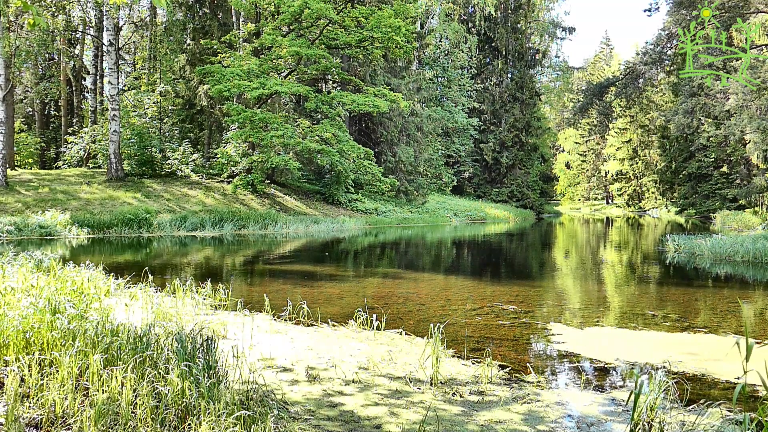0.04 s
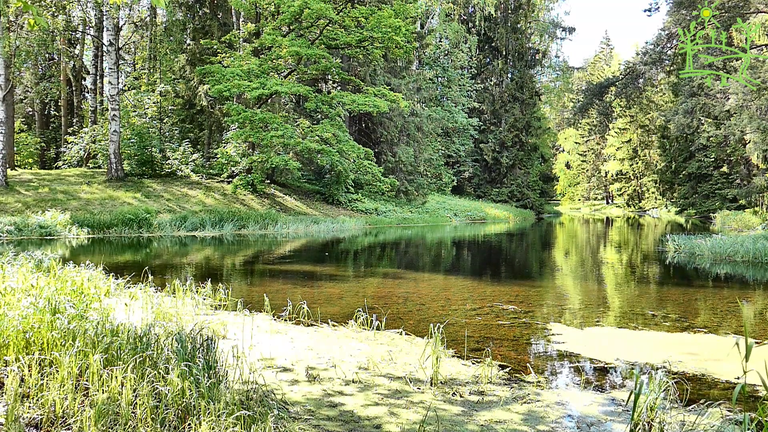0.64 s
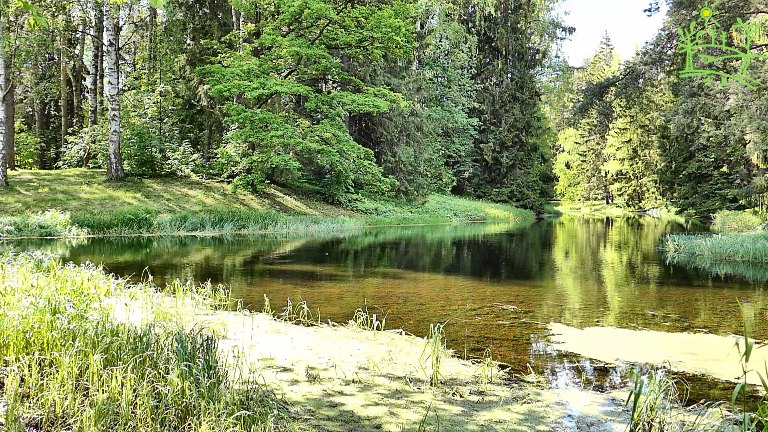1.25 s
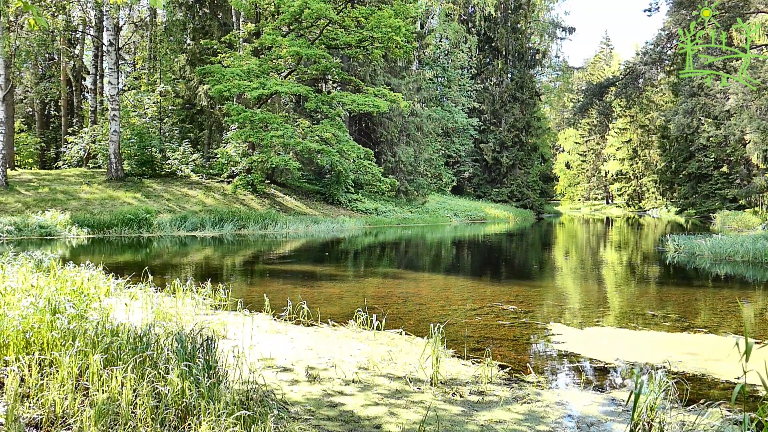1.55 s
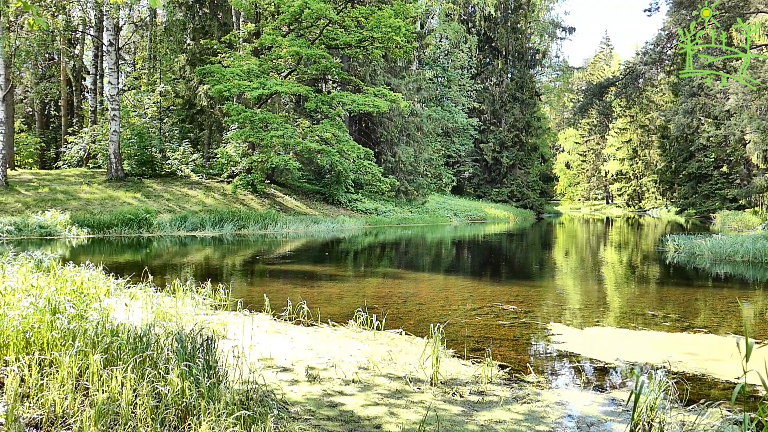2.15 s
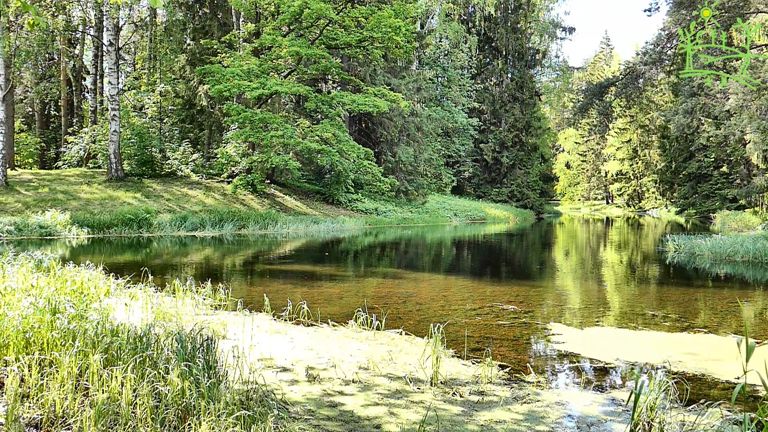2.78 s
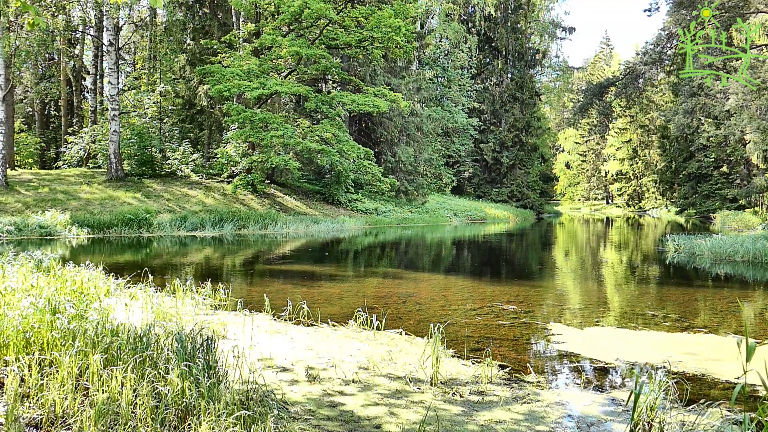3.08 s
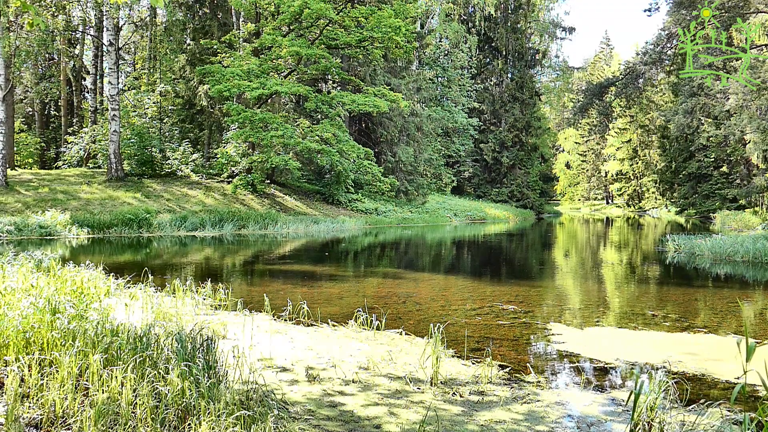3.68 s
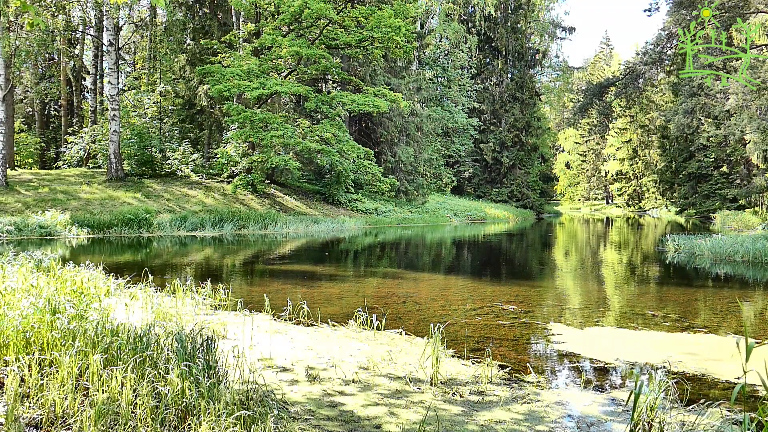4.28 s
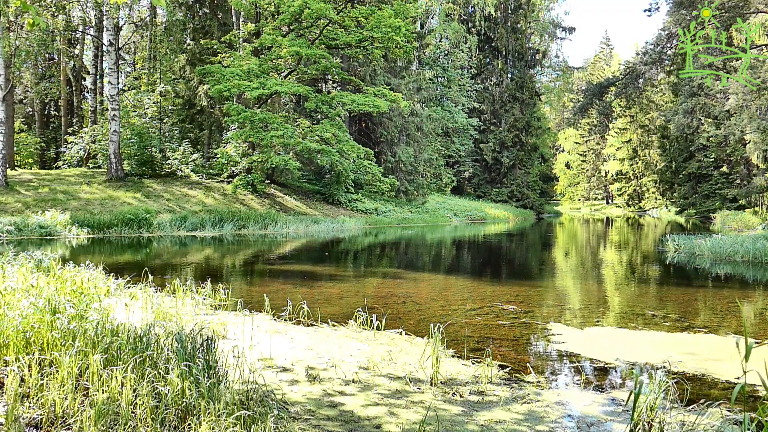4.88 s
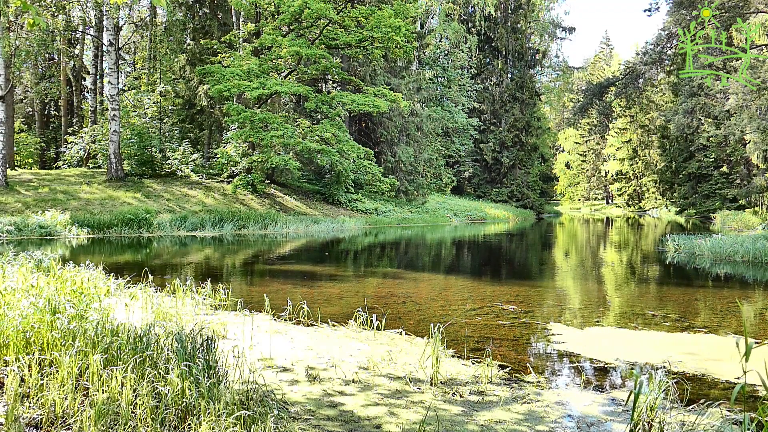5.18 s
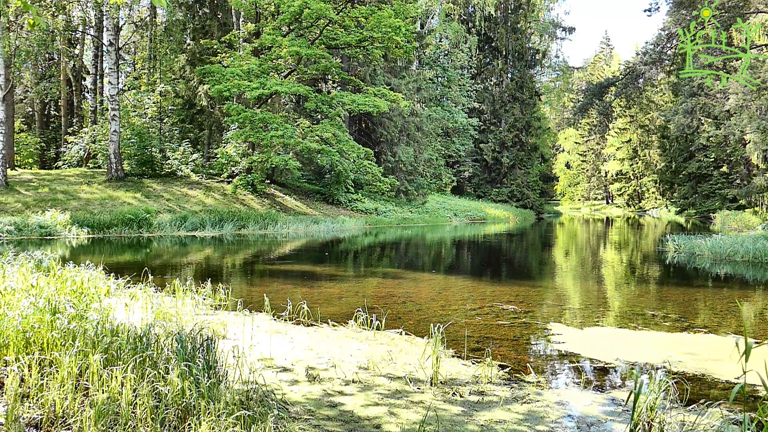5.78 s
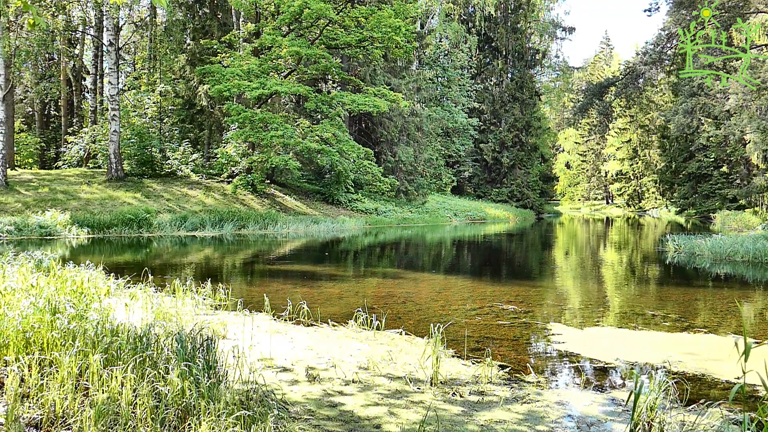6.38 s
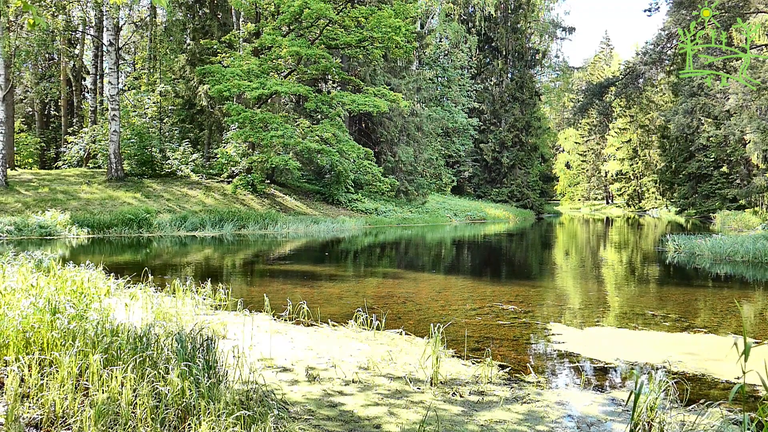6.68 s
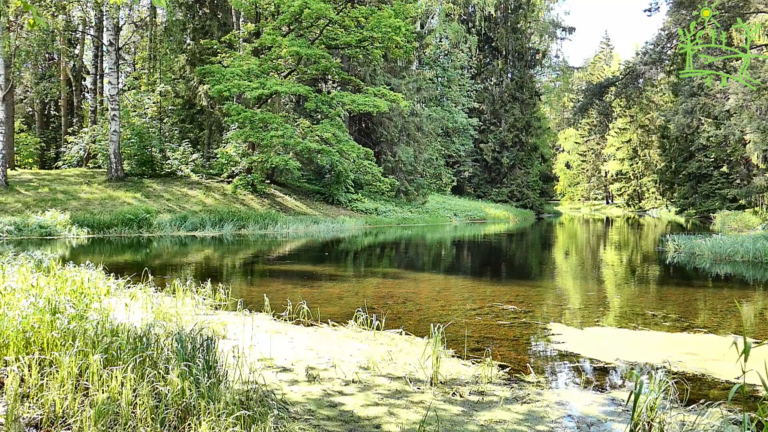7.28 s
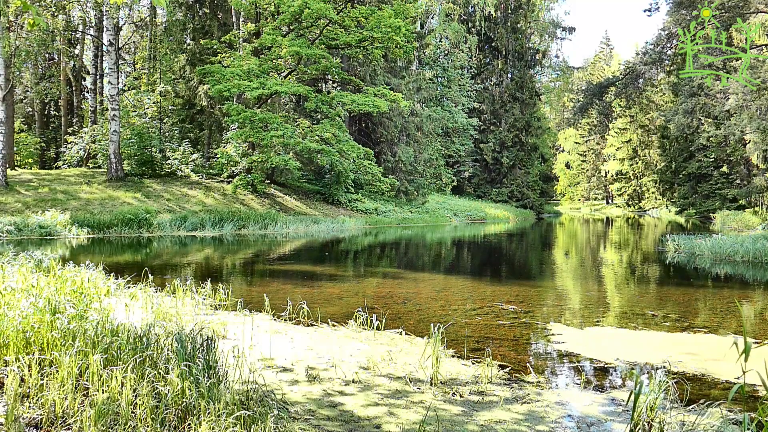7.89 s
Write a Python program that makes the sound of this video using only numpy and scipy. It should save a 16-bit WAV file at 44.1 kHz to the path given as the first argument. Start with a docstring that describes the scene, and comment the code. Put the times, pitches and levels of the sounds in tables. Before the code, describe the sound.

Songbirds sing by a forest pond over very faint, still air. From about 0.2 to 1.4 seconds, one bird gives three high arched whistles, each followed by a pure falling slur. Two faint pips come near 1.8 and 2.1 seconds, and a barely audible distant call near 3. The whistler resumes at about 3.1 seconds, alternating whistles and slurs and growing louder until 4.7. From 4 to 5.1 seconds, a second bird deeper among the trees overlaps it with about eight quick downward slides that ring longer. A rapid twittering phrase of chips and scooping notes, with soft raspy sounds between them, runs from 5.2 to 6 seconds and ends in an upward flourish. After a lull, a second twitter runs from 7.4 to about 8.1 seconds. The high notes carry a bright, fluttering shimmer, and the trees add a light echo.

```python
"""Songbirds at a forest pond: high arched whistles alternate with long falling slurs. A second bird joins
with a run of slides, then come two quick twittering phrases with a raspy murmur between the syllables.
Every note is a gliding pure tone; a bright, fluttering octave shimmer is laid over the high notes. The
ground, leaves and trunks echo the song, and the far bank answers faintly over very still air."""
import sys
import numpy as np
from scipy import signal
from scipy.fft import rfft, irfft, next_fast_len
from scipy.io import wavfile
from scipy.ndimage import uniform_filter1d

SR = 44100
rng = np.random.default_rng(int(sys.argv[2]) if len(sys.argv) > 2 else 0)


def unload_wav(signal):
    """Save mono or channel-first audio to the path in sys.argv[1] as 16-bit WAV at rate SR, clipped to [-1, 1]."""
    wavfile.write(
        sys.argv[1],
        SR,
        np.round(np.clip(np.atleast_2d(signal).T, -1, 1) * 32767).astype(np.int16),
    )


N = 358974

# The whistler's slurs. Each row: start and length in seconds, pitch factor at the head and at the tail,
# level in dB, swell over the note in dB.
SLUR_CUES = [(0.3881, 0.16, 1, 0.99, -20, 0.5), (0.79, 0.15, 0.97, 0.99, -20.5, -8),
             (1.18, 0.148, 0.96, 0.96, -24.5, -6), (3.0679, 0.15, 0.94, 1.012, -27, -0.5),
             (3.434, 0.15, 0.96, 1, -19.5, -2), (3.8175, 0.1571, 0.95, 0.97, -18.5, 0),
             (4.2039, 0.13, 1.014, 0.99, -17.5, -1.5), (4.5778, 0.14, 0.99, 0.99, -17.5, 2)]


def undb(db):
    """Decibels to gain."""
    return 10 ** (np.asarray(db) / 20)


def curve(rows, at):
    """Straight lines through (x, value) rows."""
    return np.interp(at, *np.transpose(rows))


def colour(x, spectrum):
    """Equalise a sound through (Hz, dB) points."""
    hz, db = np.transpose(spectrum)
    size = next_fast_len(N + SR // 10)
    bin_hz = np.arange(size // 2 + 1) * SR / size
    gain = undb(np.interp(np.log(bin_hz + 1), np.log(hz), db))
    return irfft(rfft(x, size) * gain, size)[..., :N]


def noise(spectrum, width):
    """Coloured stereo noise whose mid has rms 1; width is side over mid."""
    mid, side = colour(rng.standard_normal((2, N)), spectrum)
    return (mid + width * side * np.array([[1], [-1]])) / np.std(mid)


def add(track, start_s, sound):
    """Mix a sound into a track at a time."""
    i = max(int(start_s * SR), 0)
    part = sound[..., :max(track.shape[-1] - i, 0)]
    track[..., i:i + part.shape[-1]] += part


def gliding_note(hz, db, waver, edge_s):
    """A wavering, gliding tone and a copy an octave up, fading in over edge_s and out over twice that."""
    n = len(hz)
    wobble = 10 * uniform_filter1d(rng.standard_normal(n), size=100)
    hz = uniform_filter1d(hz * (1 + waver * wobble), size=40, mode="nearest")
    phase = 2 * np.pi * np.cumsum(hz) / SR
    edge = np.clip(np.minimum(np.arange(n), np.arange(n)[::-1] / 2) / (edge_s * SR), 0, 1)
    loudness = np.sqrt(2) * undb(db) * np.sin(edge * np.pi / 2) ** 2
    return loudness * np.array([np.sin(phase), np.sin(2 * phase)])


def syllables(shape, cues, octave_db, waver, edge_s):
    """One learnt shape, stretched, bent and swelled anew each time it is sung."""
    voice = np.zeros((2, N))
    share, shape_hz, shape_db = np.transpose(shape)
    for start, length, head, tail, db, swell_db in cues:
        progress = np.arange(int((length + edge_s) * SR)) / (length * SR)
        hz = np.interp(progress, share, shape_hz) * (head + progress * (tail - head))
        level_db = db + np.interp(progress, share, shape_db) + swell_db * (progress - .5)
        add(voice, start, gliding_note(hz, level_db, waver, edge_s))
    return voice * undb([[0], [octave_db]])


def glides(notes, octave_db, crest, droop_db, waver, edge_s=.0025):
    """Straight pitch sweeps, loudest at the crest (a share of the length) and weaker towards both ends."""
    voice = np.zeros((2, N))
    for start, length, from_hz, to_hz, db in notes:
        progress = np.arange(int((length + edge_s) * SR)) / (length * SR)
        hz = from_hz + progress * (to_hz - from_hz)
        level_db = db - droop_db * (2 * (progress - crest)) ** 2
        add(voice, start, gliding_note(hz, level_db, waver, edge_s))
    return voice * undb([[0], [octave_db]])


def flutter(voice):
    """Lay the octave shimmer over the tone; its time-shifted copies beat together and flutter."""
    # The octave's EQ. Each row: frequency in Hz, gain in dB.
    octave_eq = [(7800, -81.5), (8050, -44), (8400, -4.5), (9500, -3.5), (11000, -1.5), (13000, -4),
                 (13600, -12.5), (14500, -24.5)]
    # Its copies. Each row: time shift in seconds, gain in dB.
    copies = [(-.0058, -1), (0, 0.5), (.0058, -3), (0.0127, -16)]
    tone, octave = voice
    octave = colour(octave, octave_eq)
    return tone + sum(undb(db) * np.roll(octave, int(shift * SR)) for shift, db in copies)


def scatter(envelope, width):
    """Countless small echoes under an envelope, with unit energy."""
    mid, side = rng.standard_normal((2, len(envelope))) * envelope / np.sqrt(np.sum(envelope ** 2))
    return (mid + width * side * np.array([[1], [-1]])) / np.sqrt(1 + width ** 2)


def forest(voice, leaves_db, leaves_t60, trunks_db, trunks_t60, bank_db, width, dull_hz, pan_db=0):
    """A voice, with the shimmer laid over it, echoes off the ground, leaves, trunks and the far bank."""
    # Near reflections. Each row: delay in seconds, gain in dB, left minus right in dB.
    reflections = [(.011, -7.5, 0.5), (0.0032, -21.5, -6), (0.013, -23, -2.5)]
    # The far bank's answer. Each row: delay in seconds, relative level in dB.
    bank_envelope = [(.03, -23), (.12, -7), (.3, 0), (.55, -4.5), (.8, -18.5), (1.3, -39.5)]
    # Widening that leaves the treble nearer the centre. Each row: frequency in Hz, side gain in dB.
    side_eq = [(2500, 7), (6000, 4.5), (9000, 3), (13000, -1.5)]
    t = np.arange(int(1.5 * SR)) / SR
    onset = 1 - np.exp(-t / .0031)
    leaves = undb(leaves_db) * scatter(onset * undb(-60 * t / leaves_t60), width)
    trunks = undb(trunks_db) * scatter(onset * undb(-60 * t / trunks_t60), width)
    bank = undb(bank_db) * scatter(undb(curve(bank_envelope, t)), width)
    # foliage soaks up the treble on the long paths between the trunks
    response = leaves + bank + signal.lfilter(*signal.butter(1, dull_hz, fs=SR), trunks)
    response[:, 0] += undb(np.array([pan_db, -pan_db]) / 2)  # direct sound
    for delay, db, side_db in reflections:
        add(response, delay, undb(db + np.array([[side_db], [-side_db]]) / 2))
    left, right = signal.fftconvolve(flutter(voice)[None], response, axes=1)[:, :N]
    return (left + right) / 2 + colour((left - right) / 2, side_eq) * np.array([[1], [-1]])


def background(song):
    """Still air, the last ring of an earlier phrase, a faint noise that swells and fades with the song."""
    # The four noise colours. Each row: frequency in Hz, relative level in dB.
    air_eq = [(25, 1.5), (60, -11), (100, -5.5), (150, -20.5), (250, -16.5), (370, -18), (600, -24.5),
              (1500, -26), (3200, -18), (4300, -22.5), (6500, -25.5), (8000, -21), (9500, -19),
              (12500, -21), (15500, -26.5)]
    ring_eq = [(2500, -35), (3400, 1.5), (4700, -4), (5600, -24), (8000, -30.5), (8600, -3), (9600, -4.5),
               (10500, -22), (15000, -38.5)]
    song_noise_eq = [(25, 9.5), (100, -2.5), (250, -6.5), (500, -13.5), (1300, -20.5), (2200, -8),
                     (4000, 0.5), (15000, -20)]
    crackle_eq = [(30, -0.5), (300, -9), (1200, -11), (2500, -28.5), (8000, -63.5)]
    t = np.arange(N) / SR
    air = undb(-81) * noise(air_eq, width=.6)
    ring_db = curve([(0, -67), (.22, -70.5), (.8, -100), (1.5, -130)], t)
    ring = undb(ring_db) * noise(ring_eq, width=.65)
    song_rms = np.sqrt(np.abs(uniform_filter1d(song[0] ** 2, size=600)))
    song_noise = undb(-50.5) * song_rms ** .6 * noise(song_noise_eq, width=.82)
    # a brief low crackle on the loud second slur
    crackle = undb(-53) * np.exp(-np.abs(t - .806) / .005) * noise(crackle_eq, width=.4)
    return air + ring + song_noise + crackle


def distant_bird():
    """Faint calls from across the water, mostly echo."""
    # Each row: start and length in seconds, first and last pitch in Hz, level in dB.
    calls = [(2.04, 0.027, 3000, 3530, -99), (2.235, 0.031, 4000, 2897, -90),
             (2.435, 0.077, 3500, 3014, -86), (3.01, 0.043, 4200, 3710, -67.5)]
    voice = glides(calls, octave_db=-18.5, crest=.55, droop_db=5.5, waver=.02)
    return forest(voice, leaves_db=6, leaves_t60=.3, trunks_db=-4, trunks_t60=.7,
                  bank_db=-20.5, width=.8, dull_hz=5910, pan_db=-1)


def murmurer():
    """One soft raspy figure after every scoop and hook of the twitter, half lost in its own echo."""
    # A held note, a low note and a drop. Each row: delay and length in seconds, first and last base
    # pitch in Hz, relative level in dB.
    figure = [(0, .019, 2950, 3380, 0), (.028, .016, 2200, 2080, -12), (.045, .011, 3620, 2400, -5)]
    # Each row: start of the figure in seconds, pitch factor, level in dB.
    cues = [(5.354, 1.013, -37), (5.4617, 1.06, -36), (5.723, 1.013, -37.5), (5.834, .98, -34.5),
            (7.596, 1.08, -43.5), (7.719, 1.02, -45), (7.973, 1.04, -44.5), (8.078, 1.094, -38)]
    # A soft dip and rise open the last phrase. Each row: start and length in seconds, first and last
    # pitch in Hz, level in dB.
    opening = [(7.358, .015, 3280, 2700, -49), (7.378, .0063, 3020, 5410, -61)]
    notes = [(start + delay, length, pitch * from_hz, pitch * to_hz, db + note_db)
             for start, pitch, db in cues for delay, length, from_hz, to_hz, note_db in figure]
    voice = glides(opening + notes, octave_db=-.5, crest=.32, droop_db=3, waver=.055)  # deep waver rasps
    return forest(voice, leaves_db=-5.5, leaves_t60=.14, trunks_db=-11.5, trunks_t60=.59,
                  bank_db=-30.5, width=.37, dull_hz=9000)


def pips(length_s=.021):
    """Brief high notes of nearly level pitch."""
    # Each row: start in seconds, first and last pitch in Hz, level in dB.
    cues = [(1.752, 4980, 5265, -46), (2.145, 5310, 5174, -49.5), (2.66, 5140, 5143, -84.5),
            (4.899, 5380, 5180, -31), (5.053, 5315, 5070, -36.5)]
    notes = [(start, length_s, from_hz, to_hz, db) for start, from_hz, to_hz, db in cues]
    return glides(notes, octave_db=-2, crest=.28, droop_db=3, waver=.0087)


def twitterer():
    """Rounds of chip, scoop and hook; an upward flourish closes the first phrase. Brief high pips, two of them
    at the top of the second bird's slides, are mixed in with this echo."""
    # Syllable shapes. Each row: share of the length, base pitch in Hz, relative level in dB.
    chip = [(0.0, 6244, -4.5), (0.15, 5090, 2.5), (0.35, 4685, 9.5), (0.55, 4425, 3.5), (0.75, 4070.0, 8),
            (1.0, 2560, -16)]
    scoop = [(0.0, 6016, 11), (0.1, 3240, -2), (0.23, 2390, -15), (0.5, 2090, -33.5), (0.62, 3220, -6.5),
             (0.73, 4760.0, 2.5), (0.86, 5087, -1), (1.0, 5066, -5.5)]
    hook = [(0, 2567, 2), (.14, 4950, -4), (.3, 6000, -20), (.52, 6546, -6.5), (.75, 5740, 16.5),
            (.89, 4310, 9), (1, 2820, -15.5)]
    flourish = [(0, 3104, -10), (.25, 3662, -8.5), (.38, 4676, -3.5), (.5, 5564, -2), (.7, 6050, 1.5),
                (.88, 6230, -5.5), (1, 6385, -4)]
    # Where each is sung. Each row: start and length in seconds, pitch factor at the head and at the
    # tail, level in dB, swell over the note in dB.
    chip_cues = [(5.2189, 0.027, 0.99, 0.86, -30.5, -23.5), (5.5773, 0.03, 0.97, 0.98, -26, -6),
                 (7.46, 0.025, 1.072, 1.05, -31.5, 6.5), (7.8344, 0.021, 1.083, 1.04, -24, 5.5)]
    scoop_cues = [(5.2741, 0.045, 0.9, 1.013, -26.5, 9.5), (5.639, 0.049, 0.87, 1.077, -33, -5.5),
                  (7.5172, 0.048, 1.036, 1.018, -32.5, 17.5), (7.889, 0.046, 1.034, 0.96, -24.5, 15.5)]
    hook_cues = [(5.4015, 0.034, 0.99, 0.99, -35, -8), (5.773, 0.035, 1.17, 0.89, -39.5, -4.5),
                 (7.648, .032, 1.13, 0.95, -37.5, -6.5), (8.019, 0.036, 1.04, 0.9, -43, 20)]
    flourish_cues = [(5.945, 0.047, 0.96, 1, -22.5, 0)]
    voice = syllables(chip, chip_cues, octave_db=1.5, waver=.005, edge_s=.00099)
    voice += syllables(scoop, scoop_cues, octave_db=.5, waver=.02, edge_s=.0023)
    voice += syllables(hook, hook_cues, octave_db=1, waver=.0041, edge_s=.0014)
    voice += syllables(flourish, flourish_cues, octave_db=1, waver=.013, edge_s=.0029)
    voice += pips()
    return forest(voice, leaves_db=-8.5, leaves_t60=.15, trunks_db=-15, trunks_t60=.37,
                  bank_db=-34.5, width=.42, dull_hz=12000)


def slider():
    """A second bird deeper among the trees, with a longer ring; its slides all fall at one rate."""
    # Each row: start and length in seconds, first pitch in Hz, level in dB.
    slides = [(3.9736, 0.053, 4874, -33), (4.1417, 0.065, 5087, -26), (4.2973, 0.065, 5037, -24.5),
              (4.449, 0.06, 4960, -21.5), (4.601, 0.067, 5080, -26.5), (4.7534, 0.067, 5050, -23.5),
              (4.919, 0.016, 4840, -25), (4.9347, 0.055, 4616, -27.5), (5.0732, 0.072, 5084, -23)]
    fall_hz_per_s = 37700
    notes = [(start, length, hz, hz - fall_hz_per_s * length, db) for start, length, hz, db in slides]
    voice = glides(notes, octave_db=2.5, crest=.28, droop_db=7.5, waver=.007)
    return forest(voice, leaves_db=-7.5, leaves_t60=.3, trunks_db=-9.5, trunks_t60=1,
                  bank_db=-42.5, width=.14, dull_hz=11000, pan_db=3)


def ornaments():
    """The quick upward flick that announces each slur and the faint falling note that trails it."""
    # Each row: start in seconds, level in dB.
    flick_cues = [(0.364, -40.5), (.763, -22.5), (1.162, -27.5), (3.048, -53), (3.4117, -30.5),
                  (3.8049, -25), (4.181, -25), (4.555, -27.5)]
    flick_s, flick_hz = .0098, (4850, 6600)
    trail_delay_s, trail_s, trail_hz, trail_db = .208, .024, (5600, 4250), -36
    flicks = [(start, flick_s, *flick_hz, db) for start, db in flick_cues]
    trails = [(start + trail_delay_s, trail_s, *trail_hz, db + trail_db)
              for start, _, _, _, db, _ in SLUR_CUES]
    return glides(flicks + trails, octave_db=1, crest=.43, droop_db=2.5, waver=.006)


def whistler():
    """The lead bird: arched whistles, each answered by a long, very pure falling slur."""
    # Syllable shapes. Each row: share of the length, base pitch in Hz, relative level in dB.
    arch = [(0, 3500, -12), (.06, 5660, -3), (.11, 6316, -2), (.3, 6432, -1), (.55, 6540, -1),
            (.88, 6430, 0), (.95, 5400, 3), (1, 3300, -16)]
    slur = [(0.0, 6600, -7), (0.04, 5280.0, 1.5), (0.1, 4630, 1.5), (0.2, 4250, 2), (0.35, 3980, 0.5),
            (0.6, 3684, -2.5), (0.93, 3518, -5), (1.0, 3426, -3)]
    # Where the arch is sung, with the same columns as SLUR_CUES.
    arch_cues = [(.228, .077, 1.01, 1.04, -43, 13), (.627, .094, 1, 1, -21.5, 0),
                 (1.008, .102, 1.03, .985, -26, 0), (3.274, .089, .98, .99, -33, 0),
                 (3.661, .093, 1.05, .975, -25.5, 3), (4.056, .081, 1, 1.035, -28.5, 2),
                 (4.421, .084, 1, 1.03, -30, 0)]
    voice = undb(-.33) * syllables(arch, arch_cues, octave_db=1.5, waver=.0035, edge_s=.0008)
    voice += syllables(slur, SLUR_CUES, octave_db=2, waver=.0035, edge_s=.004)
    voice += ornaments()
    return forest(voice, leaves_db=-10, leaves_t60=.18, trunks_db=-18, trunks_t60=.58,
                  bank_db=-60, width=.73, dull_hz=3500)


def scene():
    """Several songs over the quiet pond."""
    song = whistler() + slider() + twitterer() + murmurer()
    return song + distant_bird() + background(song)


def record(dry):
    """A steep cut of the top treble and a tiny steady offset."""
    top_hz, offset = 15600, -.0008
    return signal.sosfilt(signal.ellip(10, .2, 80, top_hz, fs=SR, output="sos"), dry) + offset


dry = scene()
out = record(dry)
unload_wav(out)
```